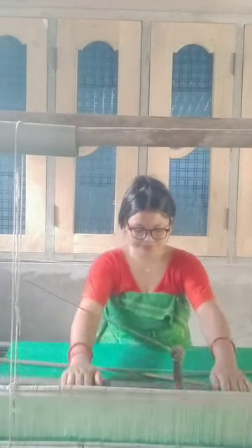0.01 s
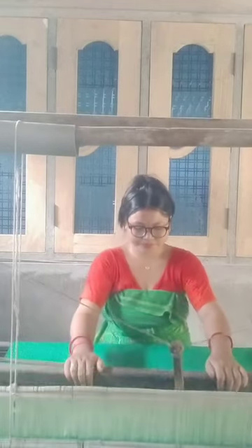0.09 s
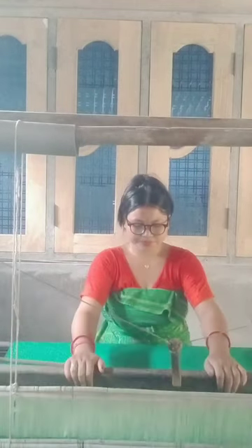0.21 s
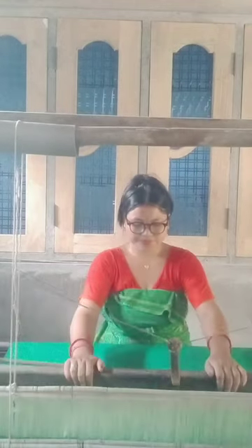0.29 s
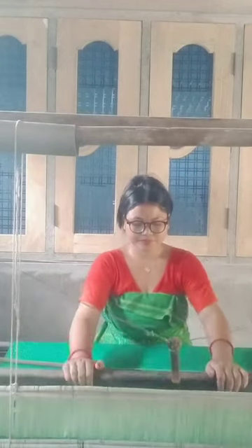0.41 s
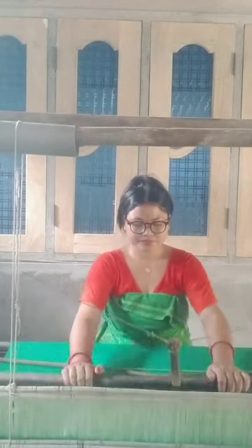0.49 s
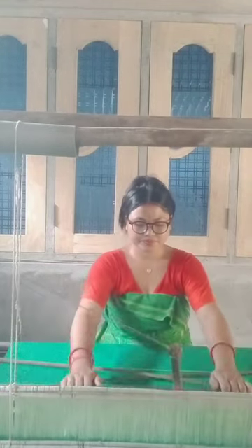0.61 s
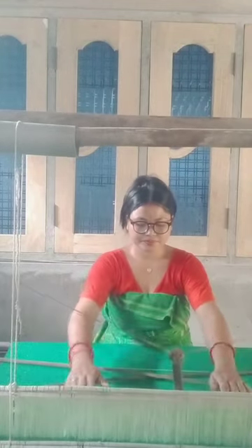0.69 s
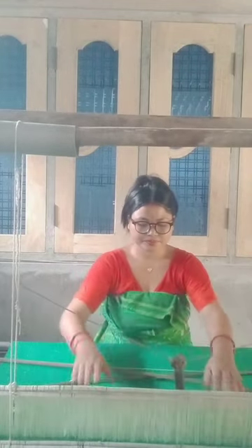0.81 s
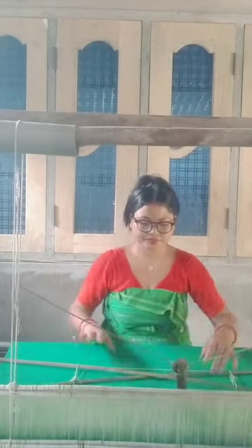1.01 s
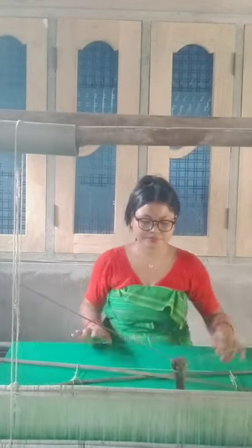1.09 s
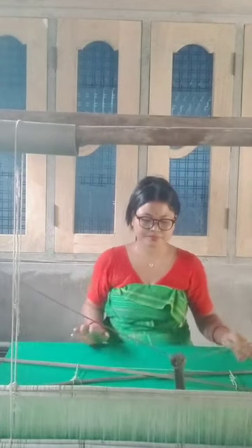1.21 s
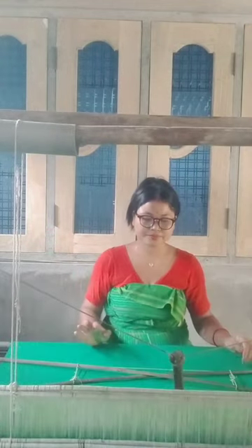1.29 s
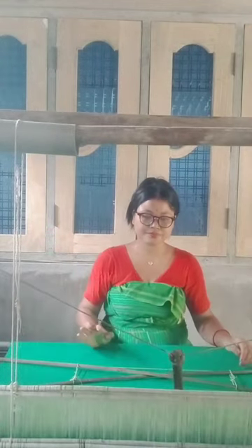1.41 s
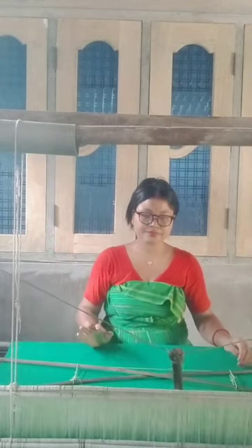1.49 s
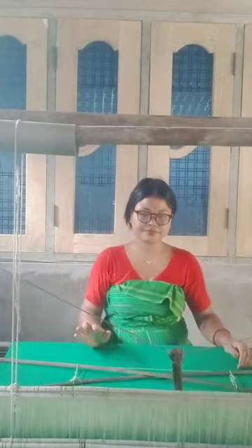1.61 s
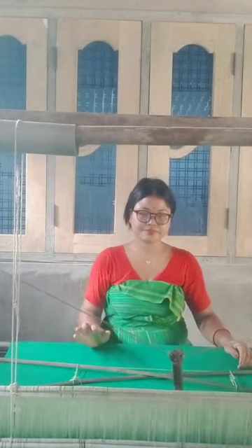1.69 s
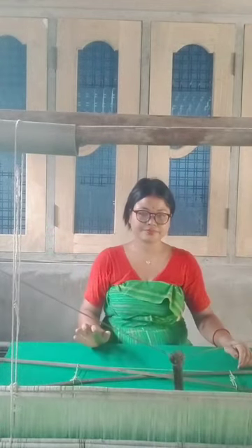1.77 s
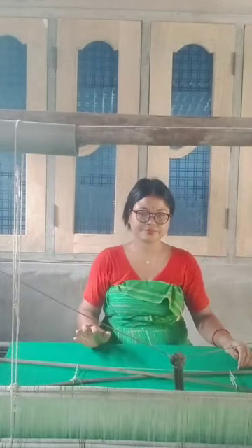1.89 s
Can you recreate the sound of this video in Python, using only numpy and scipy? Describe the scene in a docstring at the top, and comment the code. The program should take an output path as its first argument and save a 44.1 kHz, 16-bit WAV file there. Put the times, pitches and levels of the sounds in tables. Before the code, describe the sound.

A wooden handloom beater, close up in a quiet, slightly echoing room. A faint rasp leads to a loud, multiple slam at 0.2-0.3 s, with low thuds and loose wood rattling until 0.4. Weak knocks come at 0.5 and 0.6, a clearer hollow knock at 0.9, faint ones near 1.17. Threads brush softly at 1.1-1.4; tiny taps and ticks follow at 1.6-1.9 over faint hum and hiss.

```python
"""The beater of a wooden handloom, indoors, close to a small microphone: it rasps along the warp, slams home
amid a rattle of loose wooden parts, then the frame settles with hollower knocks and light taps.
Wood is click bursts filtered or ringing; the rasp is dense grains in three bands; thuds are soft dying sines.
Threads brush and small parts tick. Behind them lie quiet room noise, a wavering hum and a thin high hiss."""
import sys
import numpy as np
from scipy import signal
from scipy.io import wavfile
from scipy.ndimage import uniform_filter1d, minimum_filter1d

SR = 44100
rng = np.random.default_rng(int(sys.argv[2]) if len(sys.argv) > 2 else 0)


def volts_from_db(level):
    """Convert decibel levels to linear amplitude ratios."""
    exponent = np.asarray(level, float) / 20
    return 10 ** exponent


def wav_out(sig):
    """Save sig, one row per channel (or a flat mono array), as 16-bit PCM at SR to the path in sys.argv[1]."""
    wavfile.write(sys.argv[1], SR, np.round(np.clip(np.atleast_2d(sig).T, -1, 1) * 32767).astype(np.int16))


N = 83790  # 1.9 s

# Spectra below give only a shape: each filter is scaled to energy 1.
# Rasp of the beater along the warp: [t/s, body level/dB, hiss level/dB, low level/dB]
SLIDE = [(0.0, -57.5, -71, -61.5), (0.164, -57, -67, -62.5), (0.258, -40.5, -53, -27),
         (0.348, -66, -56.5, -69), (0.418, -63, -90, -48), (0.554, -62, -74.5, -88),
         (0.666, -62.5, -76.5, -58.5), (0.866, -57, -68, -73), (1.068, -65, -76, -86),
         (1.21, -71, -116, -64.5), (1.322, -71, -76.5, -67), (1.428, -75.5, -98, -67),
         (1.666, -66.5, -75.5, -78.5), (1.804, -73.5, -84, -69.5), (1.9, -69, -80, -77)]
# Middle of the rasp: [f/Hz, relative level/dB]
SLIDE_BODY = [(350, -38.5), (600, -6), (644, -0.5), (792, -7), (943, -10.5), (1130, -4), (2370, 3.5),
              (2710, -6.5), (4000, -27), (5200, -52), (8800, -120)]
# Top of the rasp: [f/Hz, relative level/dB]
SLIDE_HISS = [(2060, -37), (3500, 2.5), (4100, -4.5), (6120, 1), (7980, -6), (11500, -9.5), (12600, -9),
              (13500, -18)]
# Bottom of the rasp: [f/Hz, relative level/dB]
SLIDE_LOW = [(76, -43), (130, -16), (221, -4), (269, -5.5), (452, -8.5), (1000, -7.5), (1300, -30.5),
             (2200, -120)]

# Quiet room noise: [f/Hz, relative level/dB]
AIR = [(40, -40), (65, -25.5), (100, -5.5), (200, -6), (400, -17.5), (900, -25.5), (1500, -20), (2200, -12),
       (3000, -35.5), (4500, -39.5), (8500, -40), (13000, -42)]
AIR_DB = -65.5
HUM_HZ, HUM_POLE_WIDTH_HZ, HUM_DB = 100, 28, -66
# Thin high hiss that comes and goes: [t/s, level/dB]
THIN_HISS = [(1.38, -100), (1.43, -77), (1.5, -88), (1.53, -110)]
# Its narrow band: [f/Hz, relative level/dB]
THIN_BAND = [(9800, -46), (10300, 4), (10600, -1.5), (10900, -6), (11400, -37.5)]

# Dull thuds through the floor: [t/s, level/dB before the soft start, f/Hz, t60/s]
THUDS = [(0.181, -37.5, 255, 0.16), (0.215, -14.5, 341, 0.045), (0.263, -23, 124.4, 0.075),
         (0.324, -29, 105.6, 0.18), (0.422, -36, 266, 0.12), (0.931, -37.5, 296, 0.2),
         (1.023, -28.5, 113, 0.078), (1.203, -39.5, 238, 0.06), (1.615, -40, 307, .08),
         (1.803, -48.5, 189.5, 0.1), (1.864, -44, 179, .12)]

# Loose parts shaking all through the slam: [t/s, body level/dB before the trim, treble level/dB]
RATTLE = [(0.2125, -40.5, -60), (0.215, -32.5, -46), (0.236, -4.5, -45.5), (0.248, -15.5, -41.5),
          (0.314, -9.5, -57), (0.334, -16.5, -51.5), (0.376, -23.5, -67), (0.4, -59, -72.5)]
RATTLE_PER_S, RATTLE_BODY_TRIM_DB = 1300, -8.5
# Wooden body of blows and rattle: [f/Hz, relative level/dB]
WOOD = [(40, -56), (110, -24.5), (330, -17.5), (760, -12.5), (900, -8), (1300, -1.5), (1900, 0.5),
        (2300, -4.5), (2700, -13), (3500, -23), (3900, -40.5), (4500, -71.5)]
# Treble crack of blows, rattle and knocks: [f/Hz, relative level/dB]
CRACK = [(2500, -42), (3800, -3.5), (5000, 1.5), (6200, -3.5), (7500, -10), (9500, -18.5), (13000, -20.5)]
CRACK_DB = -36.5  # against the body, before each strike's treble lift
RATTLE_TILT_DB, BLOW_TILT_DB = -3, 3.5  # treble tilt per octave: the blows crack brighter than the rattle
# Beater slamming home: [t/s, level/dB, clatter decay/s, treble lift/dB]
BLOWS = [(0.2148, -16, 0.007, 17.5), (0.2314, -5, 0.0064, -8.5), (0.268, -11, 0.0024, -8.5),
         (0.273, -12, 0.0093, -4.5), (0.309, -7, 0.0027, 2.5)]

# Hollower knocks of the frame settling:
# [t/s, level/dB, swell/s, clatter decay/s, treble lift/dB, body tilt/dB per octave]
KNOCKS = [(0.508, -34.5, .004, 0.01, 9, -3), (0.612, -41.5, 0.006, 0.016, 4.5, -7),
          (0.9032, -30.5, 0.0013, 0.017, 13, -2), (.905, -19.5, 0.015, 0.0044, -2.5, -1),
          (1.157, -47, 0.0043, 0.013, 11.5, -2.5), (1.181, -47, 0.0079, 0.0081, -9, -10)]
# Hollow body of a knock: [f/Hz, relative level/dB]
HOLLOW = [(90, -40.5), (200, -14.5), (300, -11.5), (380, -11), (450, -6.5), (530, -8), (660, -11), (900, 1),
          (1030, 0), (1160, 1.5), (1480, 3), (2200, -4.5), (2600, -9), (4000, -31), (5200, -53)]

# Thread brushes: [t/s, level/dB, length/s]
BRUSHES = [(1.131, -66.5, 0.047), (1.2383, -55.5, 0.033), (1.276, -57, 0.025), (1.3237, -59, 0.036),
           (1.349, -55, 0.014), (1.373, -59.5, 0.028)]
# Colour of a brush: [f/Hz, relative level/dB]
BRUSH = [(880, -17), (1500, -2.5), (1990, -12), (2400, 0.5), (3250, -21), (7160, -12), (8140, -15.5),
         (12500, -17), (13500, -20)]
# Small bright ticks: [t/s, level/dB]
TICKS = [(1.6164, -55), (1.6868, -62.5), (1.7993, -65.5)]
# Colour of a tick: [f/Hz, relative level/dB]
TICK = [(3500, -49), (4300, -12.5), (5300, -5.5), (6000, 3), (6600, -7.5), (7500, -12), (8000, -19),
        (13000, -15.5)]
# Light taps: [t/s, level/dB, clatter decay/s]
TAPS = [(1.62, -42.5, 0.0027), (1.662, -52, 0.002), (1.6848, -45.5, 0.0022), (1.81, -46, 0.0011),
        (1.868, -56, 0.0067)]
# Ringing modes of a tap: [f/Hz, relative level/dB, t60/s]
TAP_MODES = [(328, 2.5, 0.028), (1140, 14.5, 0.014), (1529, 5.5, 0.036), (1964, 6.5, 0.048),
             (2394, -3, 0.038)]

# Decay of the room: [f/Hz, t60/s]
ROOM = [(100, 0.84), (300, 0.44), (1000, 0.2), (2500, 0.19), (6000, 0.21), (12000, 0.23)]
ROOM_DB = -1
TURN_S = 0.09  # one round of the four tails, fed in turn so that the echo stays diffuse
# Treble spread, side against mid, before a common lift: [f/Hz, level/dB]
WIDE = [(3500, -57), (4300, -11.5), (6000, -4), (9000, -7.5), (13000, -7)]
LOW_CUT_HZ, EDGE_HZ = 89, 13300
CEILING, HOLD_S = 0.8, 0.004  # input limiter: full scale is 1


def evened(x):
    """Scale to rms 1."""
    return x / np.sqrt(np.mean(x ** 2) + 1e-20)


def read(points, hz):
    """Read a table against frequency on a log axis."""
    f, value = np.transpose(points)
    return np.interp(np.log(hz + 1), np.log(f + 1), value)


def add(mix, s, sound):
    """Mix a sound in at time s."""
    part = mix[round(s * SR):][:len(sound)]
    part += sound[:len(part)]


def colour(x, points, tilt_db=0):
    """Minimum-phase filter of energy 1 with the given spectrum, tilted about 1.2 kHz in dB per octave."""
    hz = abs(np.fft.fftfreq(4096, 1 / SR))
    level_db = read(points, hz) + tilt_db * np.log2((hz + 100) / 1200)
    log_gain = np.log(volts_from_db(np.maximum(level_db, -100)))
    taps = np.fft.ifft(np.exp(np.conj(signal.hilbert(log_gain)))).real[:2048]
    return signal.fftconvolve(x, taps / np.linalg.norm(taps))[:len(x)]


def clicks(size, per_s, spread_db):
    """Random clicks of either sign, a few of them large."""
    chance = rng.random(size)
    height = volts_from_db(spread_db * np.minimum(rng.exponential(1, size), 3))
    sign = rng.choice([-1., 1.], size)
    return (chance < per_s / SR) * sign * height


def clatter(length, rise=0.002, first=2.5):
    """First contact, then a spray of clicks that swells and dies; times in s."""
    t = np.arange(6000) / SR
    swell = np.minimum(t / max(rise, 0.0005), 1)
    decay = np.exp(-np.maximum(t - rise, 0) / max(length, 0.001))
    burst = evened(clicks(6000, 5000, 1.5)) * swell * decay
    burst[20] = first
    return burst


def ring(modes):
    """Sum of dying sines, energy 1."""
    t = np.arange(4000) / SR
    out = sum(volts_from_db(db - 60 * t / t60) * np.sin(2 * np.pi * hz * t) for hz, db, t60 in modes)
    return out / np.linalg.norm(out)


def curve(table, column):
    """Gain over time from a dB column, near silence outside a table that starts late or ends early."""
    table = np.array(table)
    before = -120 if table[0, 0] > 0.1 else None
    after = -120 if table[-1, 0] < 1 else None
    return volts_from_db(np.interp(np.arange(N) / SR, table[:, 0], table[:, column], before, after))


def slide():
    """Wood and thread rubbing: dense grains in a middle, a high and a low band."""
    out = np.zeros(N)
    for column, band in enumerate([SLIDE_BODY, SLIDE_HISS, SLIDE_LOW], start=1):
        grains = evened(clicks(N, 3900, 0.83))
        out += curve(SLIDE, column) * colour(grains, band)
    return out


def room_noise():
    """Steady coloured noise of the quiet room."""
    return volts_from_db(AIR_DB) * colour(rng.standard_normal(N), AIR)


def hum():
    """Noise through a narrow double resonance, so the hum wavers."""
    turn = np.exp(2j * np.pi * HUM_HZ * np.arange(N) / SR)
    pole = np.exp(-np.pi * HUM_POLE_WIDTH_HZ / SR)
    slow = signal.lfilter([1], np.poly([pole, pole]), rng.standard_normal(N) / turn)
    return volts_from_db(HUM_DB) * evened((turn * slow).real)


def thuds():
    """Low pushes through the floor: dying sines with a soft start."""
    out, t = np.zeros(N), np.arange(12000) / SR
    for s, db, hz, t60 in THUDS:
        soft_start = 1 - np.exp(-t / 0.011)
        add(out, s, volts_from_db(db - 60 * t / t60) * soft_start * np.sin(2 * np.pi * hz * t))
    return out


def rattle():
    """Loose wooden parts shake: clicks through a wooden body, denser ones for the treble."""
    shake = volts_from_db(RATTLE_BODY_TRIM_DB) * evened(clicks(N, RATTLE_PER_S, 4))
    body = colour(curve(RATTLE, 1) * shake, WOOD)
    fine_shake = evened(clicks(N, 6000, 2.3))
    treble = colour(curve(RATTLE, 2) * fine_shake, CRACK, RATTLE_TILT_DB)
    return body + treble


def blows():
    """The beater slams home: a hard clatter drives the wooden body and a treble crack."""
    out = np.zeros(N)
    for s, db, length, lift_db in BLOWS:
        burst = clatter(length)
        crack = volts_from_db(CRACK_DB + lift_db) * colour(burst, CRACK, BLOW_TILT_DB)
        add(out, s, volts_from_db(db) * (colour(burst, WOOD) + crack))
    return out


def room(x):
    """Four tails of sparse taps, fed in turn, each band dying at its own speed."""
    out, slots = np.zeros(N), np.arange(100, SR // 2 - 20, 20)
    for k in range(4):
        taps = np.zeros(SR // 2)
        taps[slots + rng.integers(0, 20, len(slots))] = rng.choice([-1., 1.], len(slots))
        hz, t, z = signal.stft(taps, SR, nperseg=256)
        decay = volts_from_db(-60 * t / read(ROOM, hz)[:, None])
        tail = signal.istft(z * decay, SR, nperseg=256)[1]
        turn = np.arange(N) / SR / TURN_S - k / 4
        feed = np.maximum(np.cos(2 * np.pi * turn), 0)
        out += signal.fftconvolve(x * feed, tail / np.linalg.norm(tail))[:N]
    return out


def knocks():
    """The frame settles: clatters with a lighter first contact through a hollow body."""
    out = np.zeros(N)
    for s, db, swell, length, lift_db, tilt_db in KNOCKS:
        burst = clatter(length, swell, first=1.0)
        crack = volts_from_db(CRACK_DB + lift_db) * colour(burst, CRACK)
        add(out, s, volts_from_db(db) * (colour(burst, HOLLOW, tilt_db) + crack))
    return out


def brushes():
    """Threads brush past: short swells of coloured grains."""
    out, t = np.zeros(N), np.arange(5000) / SR
    for s, db, length in BRUSHES:
        shape = np.minimum(t / 0.0048, 1) * np.exp(-(t / length) ** 1.43)
        grains = evened(clicks(5000, 3600, 1.6))
        add(out, s, volts_from_db(db) * shape * colour(grains, BRUSH))
    return out


def thin_hiss():
    """Noise in one narrow high band, coming and going."""
    return curve(THIN_HISS, 1) * colour(rng.standard_normal(N), THIN_BAND)


def ticks():
    """Small parts tick: clatters through a bright filter."""
    out = np.zeros(N)
    for s, db in TICKS:
        add(out, s, volts_from_db(db) * colour(clatter(0.013), TICK))
    return out


def taps():
    """Light taps on wood: short clatters set a few modes ringing."""
    out, modes = np.zeros(N), ring(TAP_MODES)
    for s, db, length in TAPS:
        add(out, s, volts_from_db(db) * signal.fftconvolve(clatter(length), modes))
    return out


def scene():
    """Everything arrives from the front; brushes and ticks reach the room only weakly."""
    wood = rattle() + blows() + knocks() + taps()
    small = brushes() + ticks()
    echo = volts_from_db(ROOM_DB) * room(wood + 0.093 * small)
    background = room_noise() + hum() + thin_hiss()
    mono = wood + small + echo + thuds() + slide() + background
    return np.array([mono, mono])


def treble_spread(mono):
    """A phase-scrambled, spectrally smoothed copy of the treble, to differ left and right."""
    hz, t, z = signal.stft(mono, SR, nperseg=1024, noverlap=768)
    level = np.sqrt(abs(uniform_filter1d(abs(z) ** 2, size=9, axis=0)))
    level = level * volts_from_db(read(WIDE, hz) + 4.5)[:, None]
    phase = np.exp(2j * np.pi * rng.random(z.shape))
    return signal.istft(level * phase, SR, nperseg=1024, noverlap=768)[1][:N]


def limiter(x):
    """The input limiter turns the gain down around the tallest peaks, then smooths the gain."""
    span = round(HOLD_S * SR)
    gain = np.minimum(CEILING / (abs(x) + 1e-9), 1)
    return x * uniform_filter1d(minimum_filter1d(gain, size=span), size=span // 2)


def low_pass(x):
    """Removes everything above the highest recorded frequency."""
    return signal.sosfilt(signal.butter(12, 14080, fs=SR, output="sos"), x)


def record(dry):
    """Low cut and limiter on the front signal, the treble spread wide, then the upper band limit."""
    side = treble_spread(dry[0])
    low_cut = signal.butter(2, LOW_CUT_HZ, "high", fs=SR, output="sos")
    front = limiter(signal.sosfilt(low_cut, dry))
    wide = front + np.array([side, -side])
    edge = signal.firwin(255, EDGE_HZ, window=("kaiser", 8), fs=SR)
    mix = signal.oaconvolve(wide, edge[None], "same")
    return low_pass(mix)


dry = scene()
out = record(dry)
wav_out(out)
```